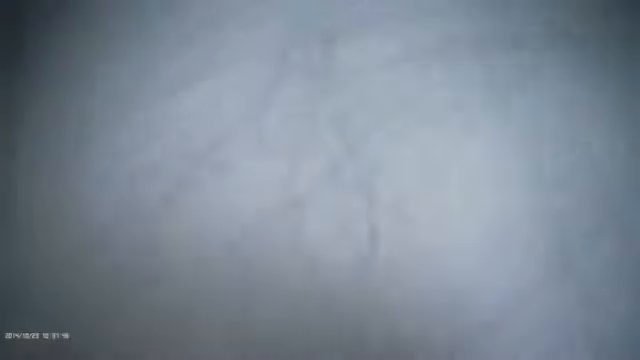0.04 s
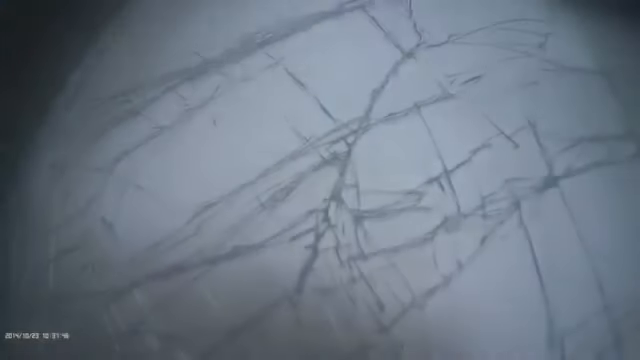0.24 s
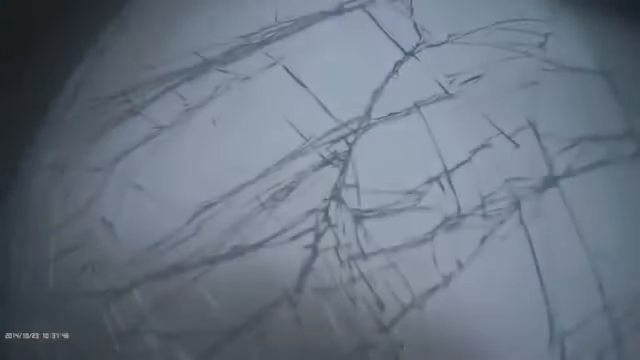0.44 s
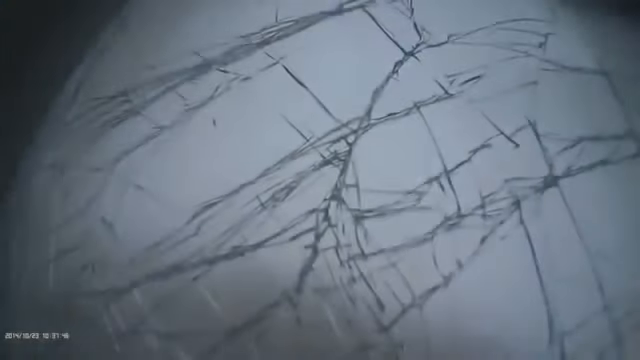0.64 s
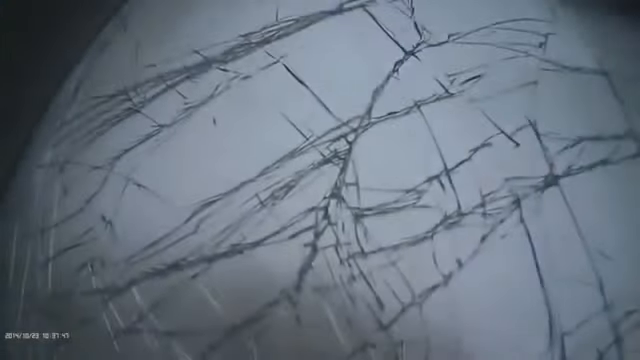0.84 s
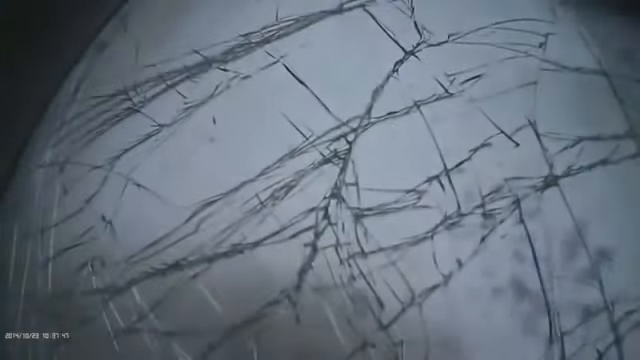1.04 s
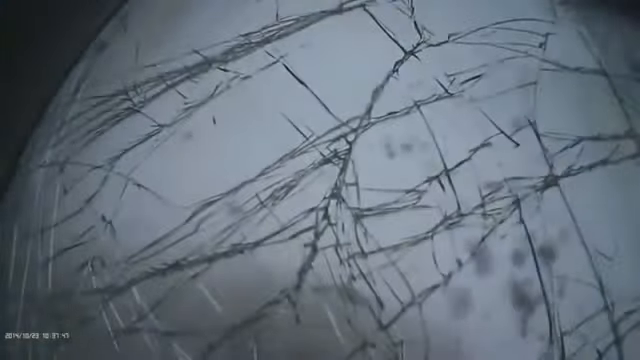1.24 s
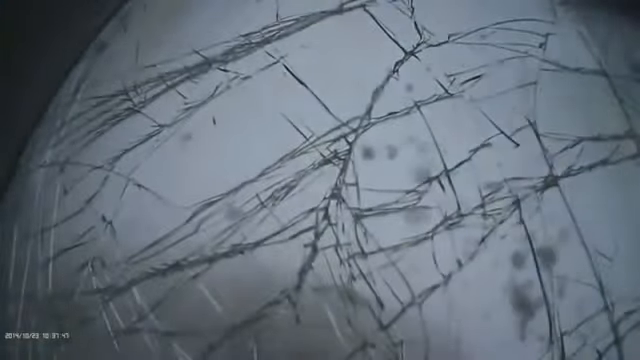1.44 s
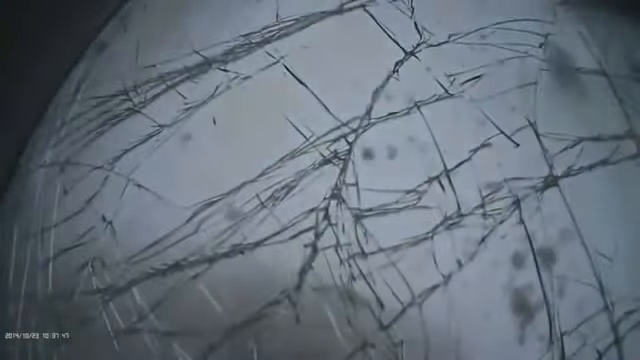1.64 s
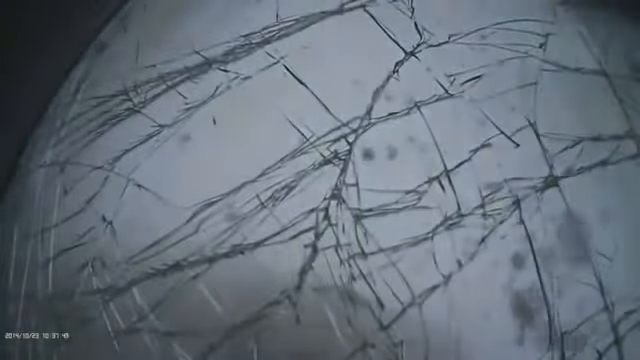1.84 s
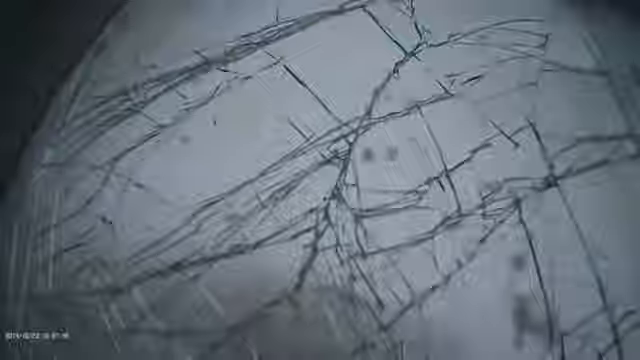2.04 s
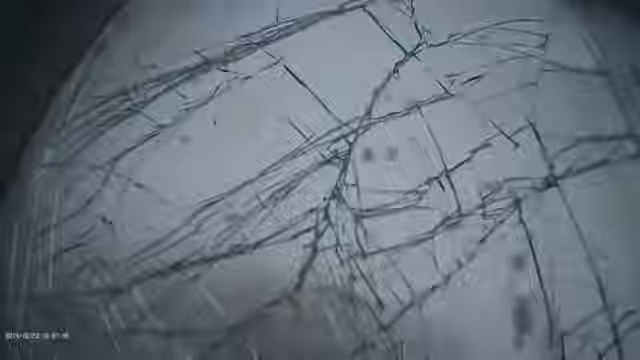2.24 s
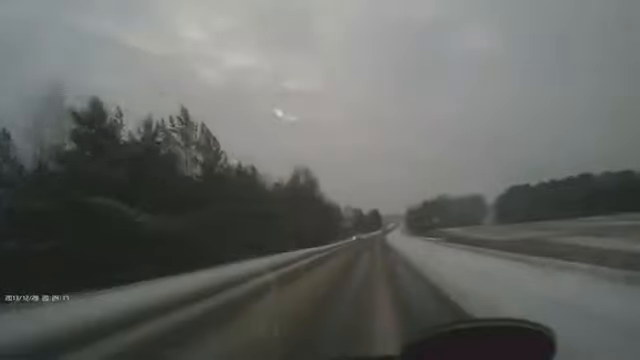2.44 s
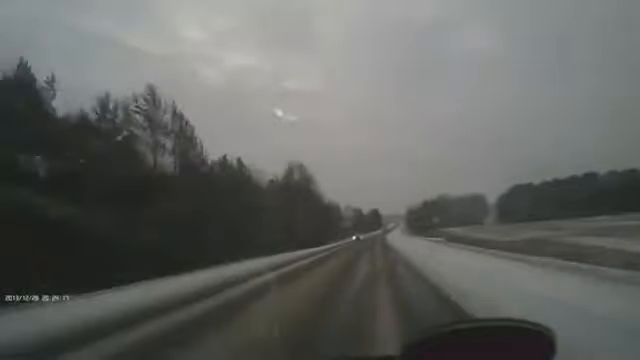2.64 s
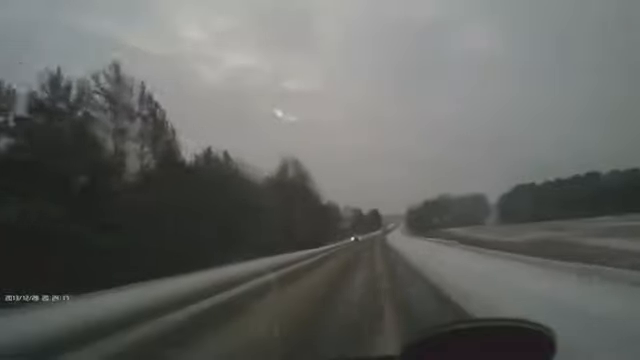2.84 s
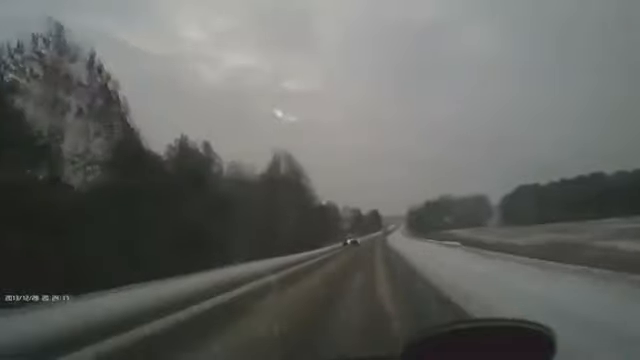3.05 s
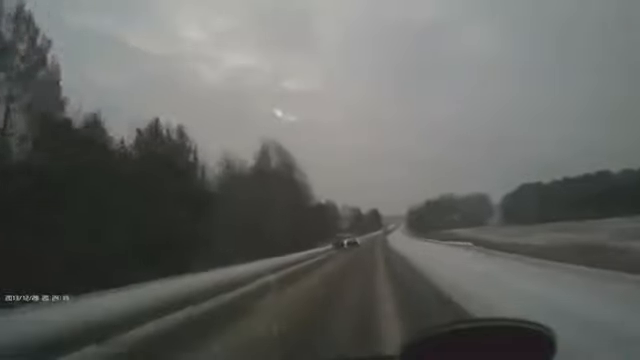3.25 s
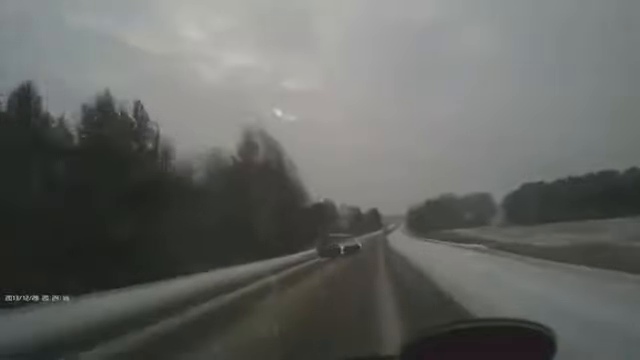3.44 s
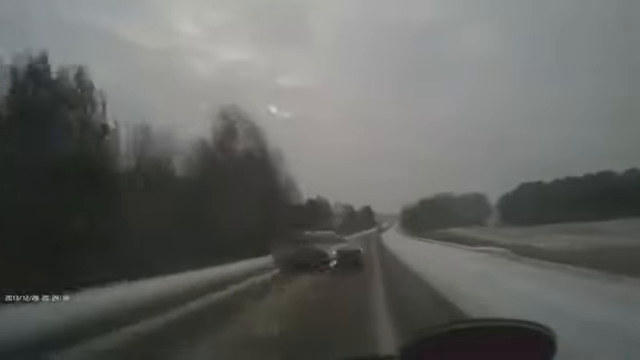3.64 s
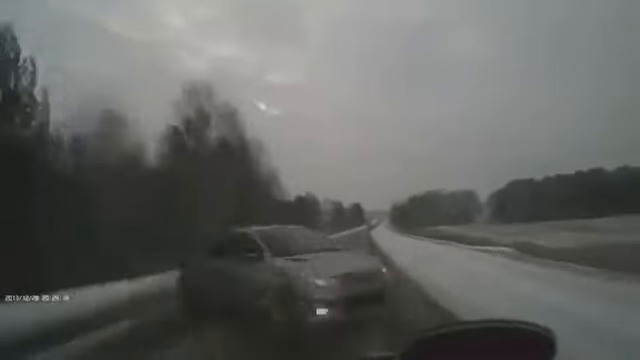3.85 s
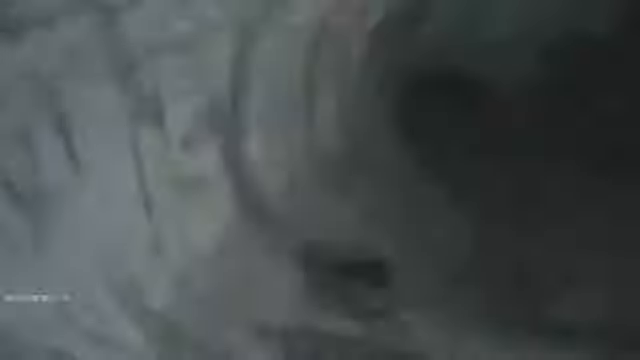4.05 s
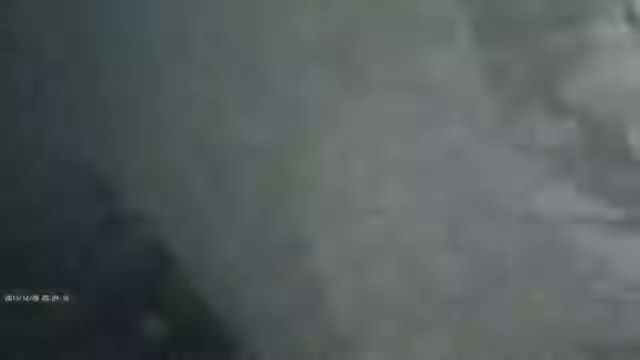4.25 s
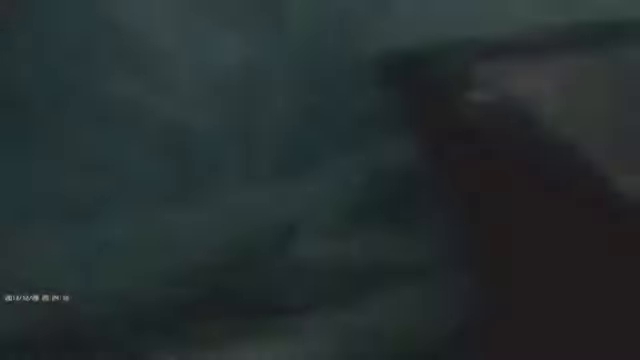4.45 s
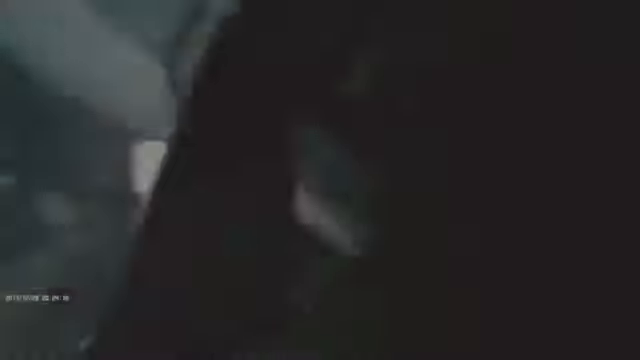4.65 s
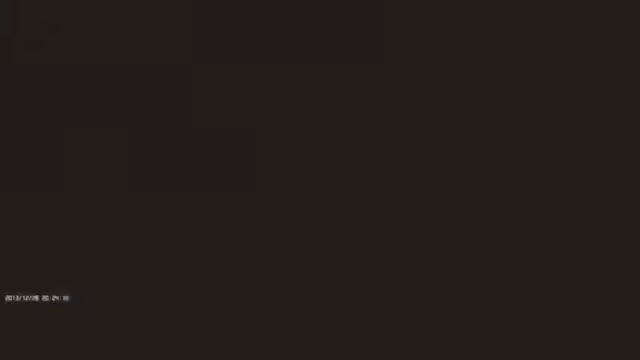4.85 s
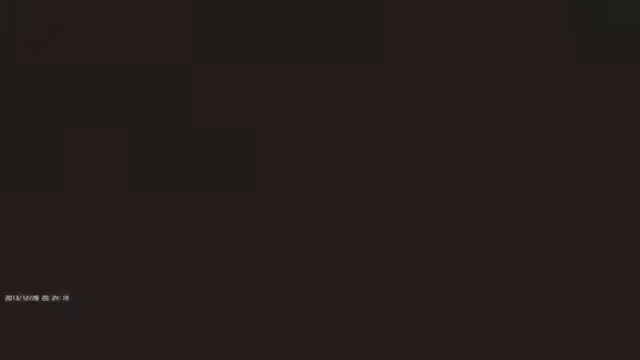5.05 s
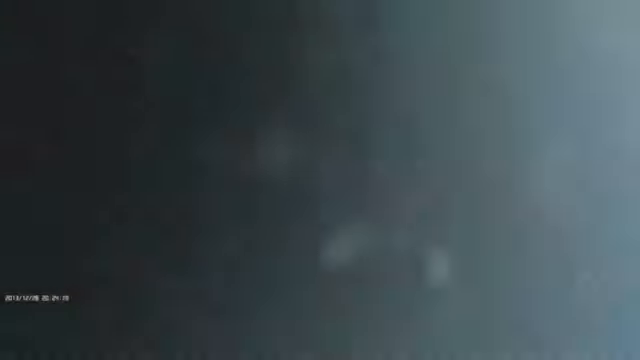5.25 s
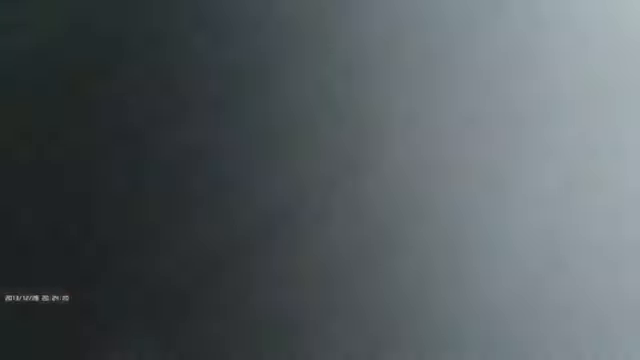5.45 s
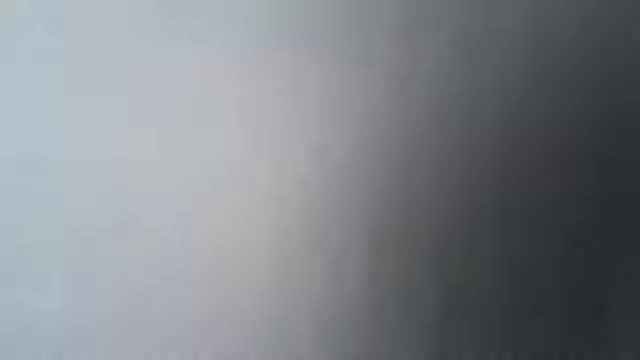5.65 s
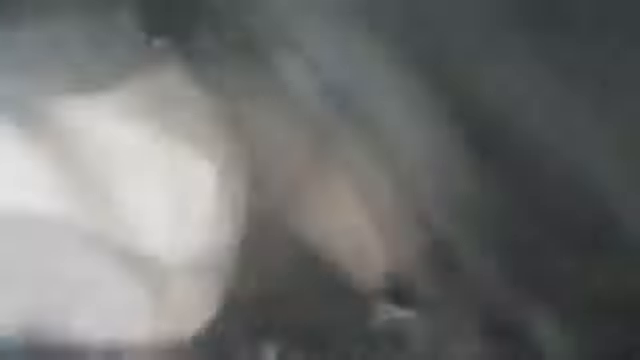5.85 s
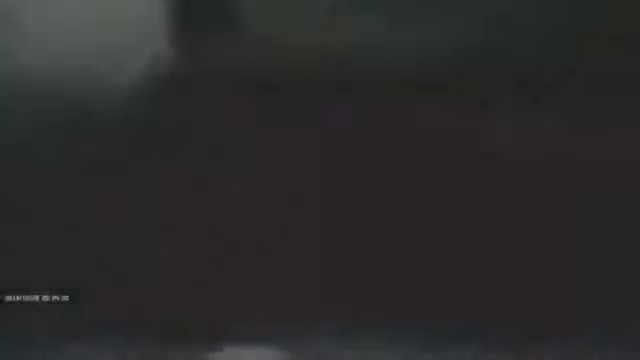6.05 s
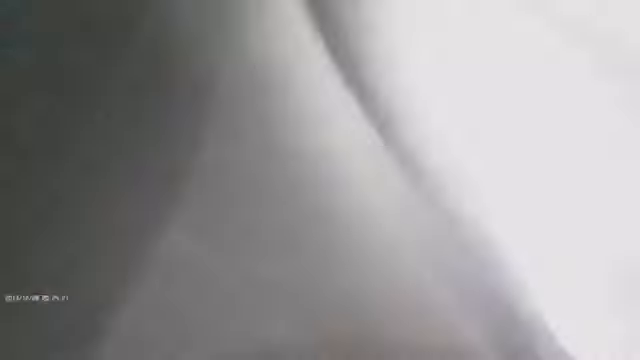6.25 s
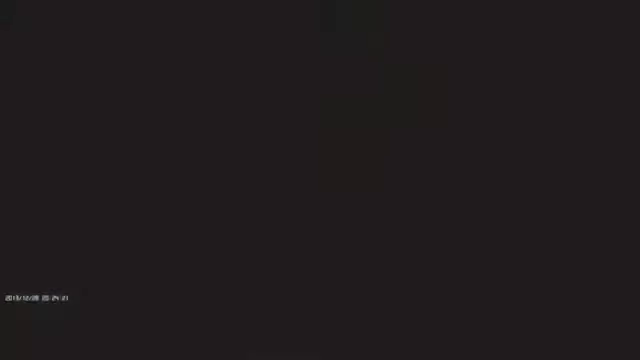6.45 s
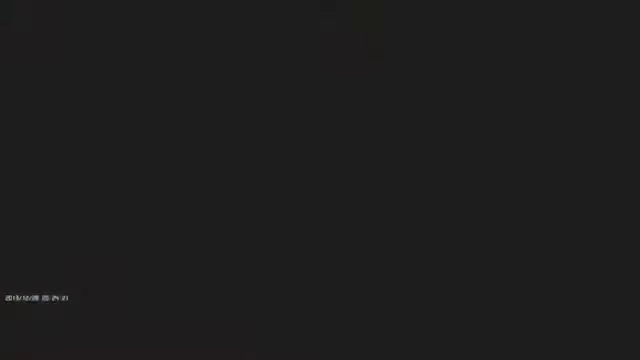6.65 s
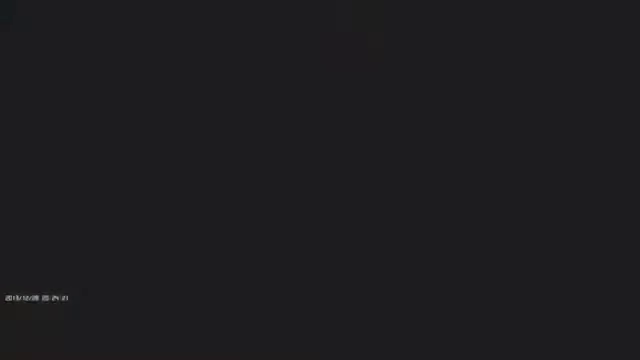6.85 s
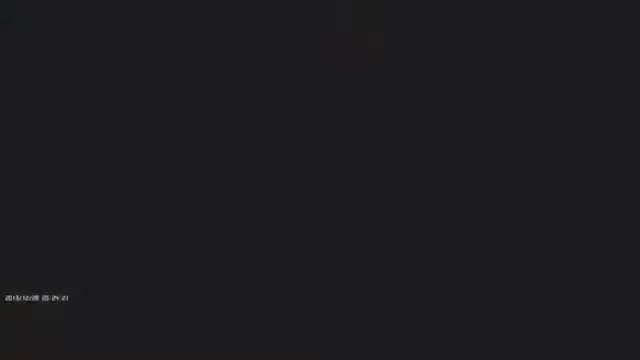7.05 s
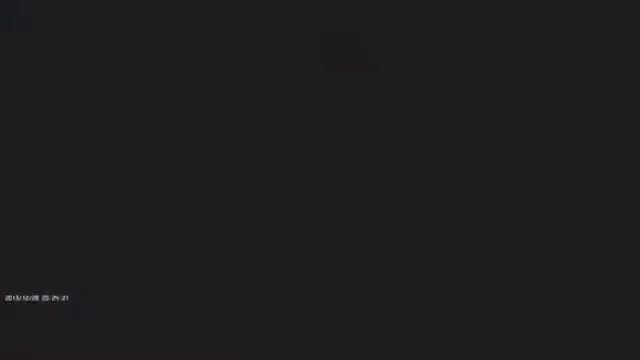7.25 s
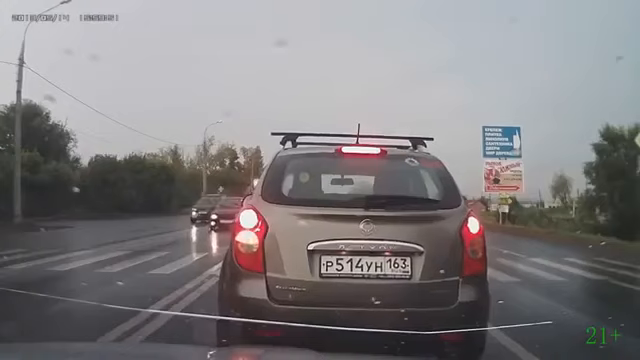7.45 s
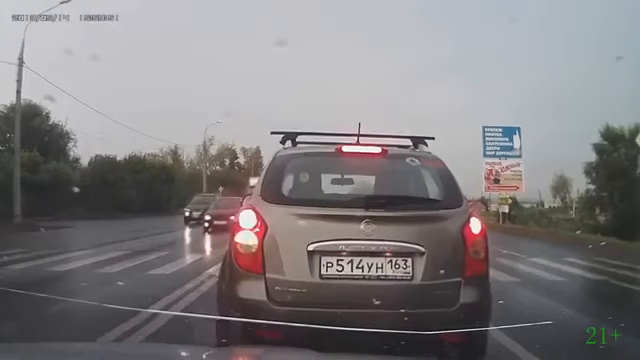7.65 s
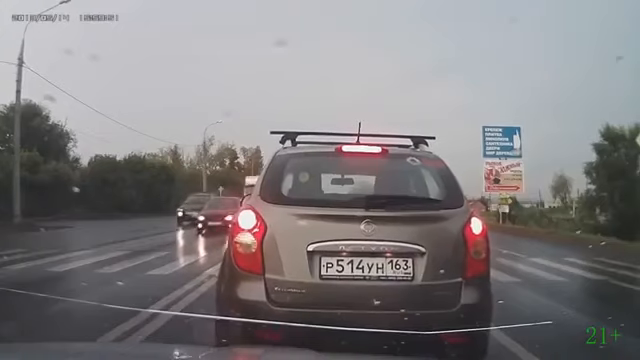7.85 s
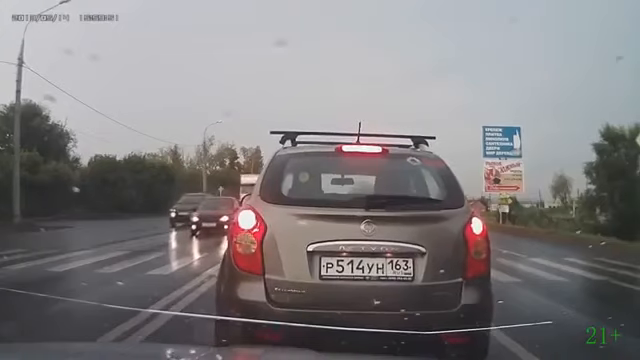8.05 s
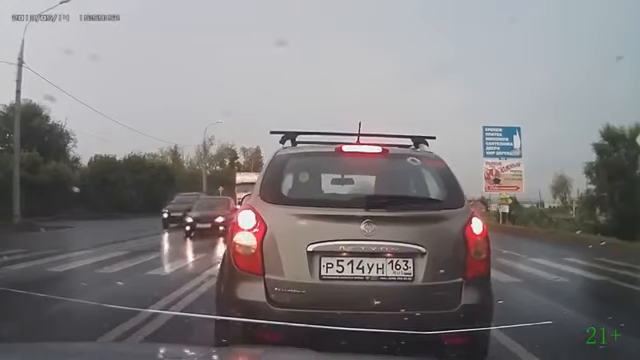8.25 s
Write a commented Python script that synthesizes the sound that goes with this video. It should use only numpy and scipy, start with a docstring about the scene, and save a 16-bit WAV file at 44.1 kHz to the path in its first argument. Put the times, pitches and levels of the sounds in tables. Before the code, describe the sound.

Three close in-cabin scenes with hard cuts. First, a car crunches twice and settles into low engine shudder, clatter and a thin mid-pitched whine. Next, subdued winter-road tyre noise, a very short raspy horn and a clipped, violent collision; the car tumbles through dense panel slams, booms, scrapes and flying shards. Last, a very quiet, low idling cabin.

```python
"""Two car crashes and an idle cabin

Three cars are heard from inside through overloaded mono microphones, joined by hard cuts. The first crunches
to rest: filtered noise and ringing grains, while its engine shudders on as wavering sines and a small motor whines.
The second runs on a winter road in tyre noise; a harmonic horn sounds, it is hit, and it tumbles in noise swells,
struck resonances and clicks of flying glass. The last is a quiet cabin at idle, in faint steady noise."""
import sys
import numpy as np
from scipy import signal
from scipy.fft import rfft, irfft
from scipy.io import wavfile
from scipy.ndimage import uniform_filter1d, map_coordinates

SR = 44100
rng = np.random.default_rng(int(sys.argv[2]) if len(sys.argv) > 2 else 0)


def store_pcm(level_fs):
    """Save levels as 16-bit WAV."""
    pcm = np.round(np.clip(level_fs, -1, 1) * 32767).astype(np.int16)
    wavfile.write(sys.argv[1], SR, np.atleast_2d(pcm).T)


N = 366471
TIME = np.arange(N) / SR  # s
FIRST_CUT_S, SECOND_CUT_S = 2.459, 7.513  # cuts between the three cars
CRASH_S = 4.102  # the second car is hit
TOP_HZ = 15200  # upper band limit


def amp(db):
    """Logarithmic level: decibels become linear gain."""
    return 10 ** (np.asarray(db) / 20)


def unit(x):
    """Energy normalisation: scale to rms 1."""
    return x / np.sqrt(np.mean(x ** 2) + 1e-20)


def curves(rows):
    """Linear interpolation: one value per sample for each column after the time."""
    s, *columns = np.transpose(rows)
    return [np.interp(TIME, s, column) for column in columns]


def between(start, end):
    """Gating: a window in time with 2 ms edges."""
    return np.clip(np.minimum(TIME - start, end - TIME) / .002, 0, 1)


def wobble(rate):
    """Random modulation: a smooth curve through random knots, rate per second."""
    knots = rng.standard_normal(int(N * rate / SR) + 4)
    return map_coordinates(knots, [TIME * rate])


def swell(start, rise, hold, t60):
    """Exponential decay: a gain that rises, holds and dies away by 60 dB in t60."""
    age = TIME - start
    attack = np.clip(age / max(rise, .001), 0, 1)
    return attack * amp(-60 * np.maximum(age - rise - hold, 0) / t60)


def colour(x, points, ripple_db=0):
    """Minimum-phase filtering: a causal spectral shape; ripple adds random resonances."""
    size = 8192
    log_hz = np.log(np.fft.rfftfreq(size, 1 / SR) + 1)
    hz, db = np.transpose(points)
    shape_db = np.interp(log_hz, np.log(hz), db)
    ripple = np.interp(log_hz, np.linspace(4, 10, 50), rng.standard_normal(50))
    cepstrum = irfft(np.log(amp(shape_db + ripple_db * ripple)))
    # folding the cepstrum onto positive time makes the response causal
    cepstrum[1:size // 2] *= 2
    cepstrum[size // 2 + 1:] = 0
    response = irfft(np.exp(rfft(cepstrum)))
    return signal.fftconvolve(x, response / np.linalg.norm(response))[:len(x)]


def noise(points):
    """Spectral shaping: coloured noise of rms 1."""
    return unit(colour(rng.standard_normal(N), points))


def grains(rate, centre_hz, cycles, scatter_db):
    """Granular fracture: many small cracks, each a damped ring of its own pitch and size."""
    count, t = int(rate * N / SR), np.arange(600) / SR
    start = rng.integers(0, N, (count, 1))
    size = np.minimum(rng.exponential(size=(count, 1)), 4)
    hz = np.minimum(centre_hz * np.exp(rng.standard_normal((count, 1)) * 0.61), TOP_HZ)
    damped = np.sin(2 * np.pi * hz * t) * np.exp(-hz * t / cycles)
    rings = amp(scatter_db * size) * np.sqrt(hz) * damped
    where = start + np.arange(len(t))
    return unit(np.bincount(where.ravel(), rings.ravel(), N)[:N])


def jolts(rate, decay, steady):
    """Stick and give: sudden random give-ways that die fast, over a steady share."""
    slips = (rng.random(N) < rate / SR) * rng.uniform(.4, 1, N)
    return unit(signal.lfilter([1], [1, -np.exp(-1 / (decay * SR))], slips) + steady)


# bending metal: new shapes per s, how far one dominates, depth of its resonances
BEND_RATE, BEND_DB, BEND_RIPPLE_DB = 14, 10, 4.5


def buckling(points):
    """Shifting modes: in bending sheet metal one set of resonances gives way to the next."""
    mix = np.zeros(N)
    for _ in range(6):
        prominence = amp(BEND_DB * wobble(BEND_RATE))
        mix += prominence * colour(rng.standard_normal(N), points, BEND_RIPPLE_DB)
    power = np.abs(uniform_filter1d(mix ** 2, size=1024))
    return mix / np.sqrt(power + 1e-12)  # hold the loudness even


def add(track, s, sound):
    """Superposition: mix a sound in at time s."""
    part = track[max(round(s * SR), 0):][:len(sound)]
    part += sound[:len(part)]


def strikes(rows, spectrum, ripple_db, tail_db=-40, tail_t60=0.24):
    """Impact excitation: each blow bursts through its own resonances, then leaves a short rattle."""
    out, t = np.zeros(N), np.arange(SR // 3) / SR
    onset = 1 - np.exp(-t / 0.00039)
    for s, db, t60 in rows:
        decay = amp(-60 * t / max(t60, .005))
        tail = amp(tail_db - 60 * t / tail_t60)
        force = (decay + tail) * onset * rng.standard_normal(len(t))
        add(out, s, amp(db) * colour(force, spectrum, ripple_db))
    return out


# the second car's shell hits the other car, then the ground as it rolls:
# start_s, hold_s, boom level_db, crumpling metal level_db
LANDINGS = [(4.1, 0.14, -12, -6.5), (4.737, 0.037, -16, -19), (5.047, 0.091, -14, -25),
            (5.214, 0.16, -10, -9.5), (5.907, 0.12, -20.5, -14), (6.94, 0.16, -21, -35),
            (7.315, 0.13, -15, -25)]
# sliding between landings: time_s, scraping metal level_db, loose glass level_db
SLIDE = [(4.35, -11.5, -35), (4.6, -19.5, -27.5), (5.55, -19, -37), (5.9, -18, -29), (6.5, -29.5, -36.5),
         (6.85, -27, -28), (7.2, -32.5, -45), (7.5, -38, -45.5)]
# relative spectra of the booming shell, sheet metal and splintering glass: frequency_hz, level_db (per Hz)
RUMBLE_SPECTRUM = [(15, -23), (35, 5.5), (90, -2.5), (220, 2.5), (550, -4.5), (1300, -19), (2600, -56.5)]
METAL_SPECTRUM = [(100, -32.5), (350, -1.5), (800, 1), (1500, 2.5), (2300, -3.5), (3200, -17.5),
                  (15000, -77)]
SPLINTER_SPECTRUM = [(500, -25.5), (1600, -1.5), (3800, 5), (5800, -3), (7300, 3.5), (8600, -4.5),
                     (15000, -13.5)]
LANDING_RISE_S, BOOM_T60_S, CRUMPLE_T60_S = 0.0066, .4, 0.32
SPLINTER_DB, SPLINTER_GROWTH = -7, 1.55  # level at unit crush; exponent of its growth with crush
DENSE_DB = -5.5  # above this crush the separate fits merge into one roar
SLIDE_RUMBLE_DB = -28


def tumble():
    """Forced vibration: landings boom, crumple metal in fits and splinter glass; in between the car slides."""
    boom, crush = np.zeros(N), np.zeros(N)
    for s, hold, boom_db, crumple_db in LANDINGS:
        boom += amp(boom_db) * swell(s, LANDING_RISE_S, hold, BOOM_T60_S)
        crush += amp(crumple_db) * swell(s, LANDING_RISE_S, hold, CRUMPLE_T60_S)
    scraping, loose_glass = amp(curves(SLIDE))
    windscreen = amp(-6.5) * swell(CRASH_S, rise=0.044, hold=0.027, t60=0.42)  # bursts in the collision
    crumpling = np.hypot(crush, scraping)
    splintering = np.hypot(amp(SPLINTER_DB) * crush ** SPLINTER_GROWTH + windscreen, loose_glass)

    separateness = 1 / (1 + (crumpling / amp(DENSE_DB)) ** 2)
    fits = 1 + (jolts(rate=150, decay=0.0035, steady=0.38) - 1) * separateness
    folds = unit(colour(grains(rate=700, centre_hz=1187, cycles=3.5, scatter_db=5.5), METAL_SPECTRUM))
    chips = unit(colour(grains(rate=500, centre_hz=5600, cycles=0.6, scatter_db=6.5), SPLINTER_SPECTRUM))
    metal = crumpling * unit(folds + buckling(METAL_SPECTRUM))
    glass = splintering * unit(chips + 0.55 * noise(SPLINTER_SPECTRUM))
    rumble = np.hypot(boom, amp(SLIDE_RUMBLE_DB)) * noise(RUMBLE_SPECTRUM)
    return rumble + fits * metal + np.sqrt(np.abs(fits)) * glass


# blows on the rolling body: start_s, level_db
BLOWS = [(4.339, -6), (4.549, -10.5), (4.561, -8), (4.592, -5), (4.623, -0.5), (4.672, -5), (4.728, 1),
         (4.763, 4.5), (4.814, -4), (4.863, -4), (4.898, -6), (4.92, -1.5), (5.005, 2.5), (5.053, -4.5),
         (5.065, -2.5), (5.134, -4.5), (5.234, -0.5), (5.283, 2), (5.37, 6), (5.49, -3.5), (5.722, -9),
         (5.78, 5), (5.831, -10), (5.949, 4), (5.989, -1.5), (6.01, -3), (6.026, 8.5), (6.057, 1.5),
         (6.122, -2), (6.174, -2.5), (6.19, 9), (6.204, 5.5), (6.233, 5), (6.274, 2.5), (6.324, 7.5),
         (6.398, 1.5), (6.438, 3.5), (6.464, 3.5), (6.591, 4), (6.697, 3), (6.791, -1.5), (6.812, -4),
         (6.846, -1), (6.856, -1.5), (6.959, -7), (6.985, -8), (7.02, -10.5), (7.039, 3.5), (7.063, 0.5)]
# relative spectra of the slammed panels and the shaken body: frequency_hz, level_db (per Hz)
PANEL_SPECTRUM = [(25, -0.5), (150, -3), (450, 2.5), (950, 4), (1600, -2), (3000, -11.5), (5800, -18.5),
                  (7300, -19.5), (9000, -27), (15000, -35.5)]
SHAKE_SPECTRUM = [(10, -7), (22, 5), (40, -2.5), (80, -5.5), (150, -11.5), (500, -66.5)]
FIRST_BLOW_T60_S, LAST_BLOW_T60_S = 0.068, .032  # blows get shorter as the car loses speed
SNAP_DB, SNAP_T60_S = -8.5, 0.016  # level relative to the blow
THUMP_DB, THUMP_T60_S = -20, 0.11  # level relative to the blow


def body_blows():
    """Modal impact: panels slam on the ground, brittle trim snaps with them and the whole shell thumps."""
    t60s = np.linspace(FIRST_BLOW_T60_S, LAST_BLOW_T60_S, len(BLOWS))
    slams = [(s, db, t60) for (s, db), t60 in zip(BLOWS, t60s)]
    snaps = [(s, db + SNAP_DB, SNAP_T60_S) for s, db in BLOWS]
    thumps = [(s, db + THUMP_DB, THUMP_T60_S) for s, db in BLOWS]
    out = strikes(slams, PANEL_SPECTRUM, ripple_db=5.0)
    out += strikes(snaps, SPLINTER_SPECTRUM, ripple_db=5.5)
    return out + strikes(thumps, SHAKE_SPECTRUM, ripple_db=2.5)


# the loudest glass and plastic bits striking near the microphone: start_s, level_db (relative)
SHARDS = [(4.489, -2.5), (4.4956, -1), (4.5495, 2), (4.654, 1), (4.665, -4), (4.8408, -4.5), (4.88, -10.5),
          (5.088, -1.5), (5.197, -4), (5.375, 2), (5.5778, -4.5), (5.808, -3.5), (6.571, -11.5),
          (6.6142, -1), (6.691, -3.5), (7.1733, -10), (7.1974, -9.5), (7.233, -13), (7.255, -11),
          (7.305, -15.5)]


def shards():
    """Short impacts: hard little bits click, each with its own ring, and tap the panel they land on."""
    out, t = np.zeros(N), np.arange(SR // 20) / SR
    for s, db in SHARDS:
        burst = amp(db - 3.5) * rng.standard_normal(len(t)) * amp(-60 * t / 0.0076)
        click = colour(burst, SPLINTER_SPECTRUM, ripple_db=3.5)
        tap = 0.89 * colour(burst, METAL_SPECTRUM)
        add(out, s, click + tap)
    return out


# relative spectrum of the grating panel edge: frequency_hz, level_db (per Hz)
GRATE_SPECTRUM = [(700, -14.5), (1450, 1), (1900, -6.5), (2430, 4), (3000, -13), (5000, -14), (15000, -58)]
GRATE_S, GRATE_RATE, GRATE_DB = 5.64, 68, -13  # start, mean slips per s, level


def grating():
    """Stick-slip friction: a panel edge judders along the ground in quick, uneven slips."""
    turns = np.cumsum(GRATE_RATE * (1 + 0.046 * wobble(40))) / SR
    slips = unit(np.exp(-1.8 * (turns % 1)))
    envelope = swell(GRATE_S, rise=0.042, hold=0.047, t60=0.04)
    return amp(GRATE_DB) * envelope * slips * noise(GRATE_SPECTRUM)


# the first car is crushed, comes down again and settles:
# start_s, rise_s, hold_s, body shake level_db, crunch level_db, crunch t60_s
CRUSHES = [(0.125, 0.0026, 0.16, -6, -5.5, 0.44), (0.831, 0.003, 0.043, -9.5, -7, 0.16),
           (0.892, 0.02, 0.13, -9.5, -15, 0.071)]
# relative spectrum of the crunching front end: frequency_hz, level_db (per Hz)
CRUNCH_SPECTRUM = [(60, -13), (200, 7.5), (900, -6), (1600, 0.5), (2300, -11), (2900, -12.5), (3700, -25),
                   (5900, -27.5), (6700, -33), (7900, -27.5), (9000, -44), (15000, -52.5)]
CLATTER_DB, SHUDDER_DB = -26.5, -24.5  # the damaged engine clatters and shakes the body
SHAKE_T60_S = 1.93  # the body goes on rocking
WRECK_BOOM_DB = -3  # shell boom relative to the crunch


def first_wreck():
    """Plastic collapse: each crush crunches the front end and leaves the body rocking, grainier when harder."""
    crush, rocking = np.zeros(N), np.zeros(N)
    for s, rise, hold, shake_db, crunch_db, t60 in CRUSHES:
        crush += amp(crunch_db) * swell(s, rise, hold, t60)
        rocking = np.maximum(rocking, amp(shake_db) * swell(s, rise + hold, 0, SHAKE_T60_S))
    level = np.hypot(crush, amp(CLATTER_DB))
    violence = np.clip(rocking / amp(-23.0), .2, 1)

    cracks = unit(colour(grains(rate=700, centre_hz=1426, cycles=1.1, scatter_db=3.5), CRUNCH_SPECTRUM))
    fits = 1 + violence * (jolts(rate=83, decay=0.0032, steady=0.69) - 1)
    bending = np.sqrt(violence) * buckling(CRUNCH_SPECTRUM)
    sheet = bending + np.sqrt(np.abs(1 - violence)) * noise(CRUNCH_SPECTRUM)
    crunch = fits * (sheet + violence * cracks) / np.sqrt(1 + violence)
    boom = amp(WRECK_BOOM_DB) * crush * noise(RUMBLE_SPECTRUM)
    shake = np.hypot(rocking, amp(SHUDDER_DB)) * noise(SHAKE_SPECTRUM)
    return shake + level * crunch + boom


# the first car's body heaves and squeezes the cabin air: start_s, length_s, level_db (before damping)
HEAVES = [(0.016, .034, 2), (.059, .068, 6), (1.041, 0.0277, 5)]


def heaves():
    """Cabin compression: a slow pressure push and its weaker rebound, strong enough to choke the microphone."""
    out = np.zeros(N)
    for s, length, db in HEAVES:
        progress = np.clip((TIME - s) / length, 0, 1)
        out -= amp(db) * np.sin(2 * np.pi * progress) * np.exp(-2 * progress)
    return out


# knocks in the cabin and dull bumps of the bodywork: start_s, level_db, t60_s
KNOCKS = [(0.0, 1.5, 0.078), (.03, 4, 0.03), (.056, 0, .014), (.1, -5, 0.03), (.288, 2.5, 0.071),
          (.364, -2, 0.035), (.433, -1.5, 0.043), (.453, -0.5, 0.0069), (.57, -10, 0.12), (.662, -16, 0.35),
          (.76, -6.5, 0.12), (.806, 0, 0.035), (.93, -2.5, 0.063), (1.026, -5, 0.063), (1.355, -14.5, 0.05),
          (2.097, -6, 0.042), (3.803, -23.5, 0.12), (4.0102, -9, 0.008)]
THUDS = [(1.438, -13, 0.17), (4.103, 3, 0.048)]
# relative spectrum of the knocked trim: frequency_hz, level_db (per Hz)
TRIM_SPECTRUM = [(100, 0.5), (700, 5.5), (1500, 5), (2300, -5.5), (4000, -22.5), (7500, -26),
                 (15000, -49.5)]


def bumps():
    """Struck resonators: knocks ring the trim and thuds the bodywork."""
    knocks = strikes(KNOCKS, TRIM_SPECTRUM, ripple_db=3.5)
    return knocks + strikes(THUDS, RUMBLE_SPECTRUM, ripple_db=3.5)


def engine():
    """Periodic rotation: two shuddering engine harmonics, a small motor's whine and a thin wavering whistle."""
    turn = 2 * np.pi * np.cumsum(36.2 + .5 * wobble(6.9)) / SR
    firing = amp(-20.0) * np.sin(turn) + amp(-23 + 1.8 * wobble(22)) * np.sin(2 * turn)
    # whine: time_s, pitch_hz, level_db
    whine_hz, whine_db = curves([(.5, 695.4, -28.5), (.85, 683, -21), (1.15, 700, -25), (2.3, 700, -23)])
    whine_phase = 2 * np.pi * np.cumsum(whine_hz + wobble(7.5)) / SR
    whine = amp(whine_db + 1.2 * wobble(5.7)) * np.sin(whine_phase)
    whistle = amp(-45) * np.sin(2 * np.pi * np.cumsum(2658 + 45 * wobble(300)) / SR)
    fade_in = np.clip((TIME - .35) / 0.13, 0, 1)
    return (firing + whine + whistle) * fade_in


# horn partials: harmonic_number, level_db (rms)
HORN = [(1, -49.5), (2, -47.5), (7, -55), (8, -55), (9, -60), (10, -49.5), (11, -65)]


def horn():
    """Harmonic series: a rasping horn of slightly unsteady pitch begins just before the collision."""
    phase = 2 * np.pi * np.cumsum(369.3 + 3 * wobble(200)) / SR
    tone = sum(amp(db) * np.sin(k * phase) for k, db in HORN)
    return np.sqrt(2) * tone * (TIME > 3.985)


# tyre roar: time_s, level_db
ROAD = [(2.46, -39.5), (3.78, -41), (3.88, -34.5), (4.1, -33.5)]
# spells of buzzing trim: start_s, length_s
RATTLES = [(2.497, 0.088), (2.82, .15), (3.205, .125), (3.635, 0.11)]
# relative spectra of the tyres and the buzzing trim: frequency_hz, level_db (per Hz)
TYRE_SPECTRUM = [(56, -0.5), (85, -11), (500, -14.5), (1300, -21.5), (3400, -44), (12000, -59)]
RATTLE_SPECTRUM = [(2500, -10.5), (5600, 1), (8200, -9.5), (10000, -23)]
RATTLE_RATE, RATTLE_DB = 70, -61  # mean taps per s, level before the spells


def road():
    """Surface excitation: tyres roar, and loose trim taps faintly throughout and buzzes in short spells."""
    tyres = amp(curves(ROAD)[0] + wobble(7.2)) * noise(TYRE_SPECTRUM)
    turns = np.cumsum(RATTLE_RATE * (1 + .3 * wobble(RATTLE_RATE))) / SR
    taps = unit(np.exp(-7 * (turns % 1)) * amp(5 * wobble(RATTLE_RATE)))
    spells = sum(between(s, s + length) for s, length in RATTLES) + 0.32
    return tyres + amp(RATTLE_DB) * spells * taps * noise(RATTLE_SPECTRUM)


# relative spectrum of the idling cabin: frequency_hz, level_db (per Hz)
IDLE_SPECTRUM = [(20, -2), (110, -24), (250, -45), (5000, -27.5), (15000, -34)]


def idle_cabin():
    """Stationary noise: the last car's quiet cabin at idle."""
    return amp(-59.0) * noise(IDLE_SPECTRUM) * (TIME > SECOND_CUT_S)


def scene():
    """Superposition: three cars one after another, the same in both channels."""
    first = (first_wreck() + heaves() + engine()) * between(0, FIRST_CUT_S)
    drive = (road() + horn()) * between(FIRST_CUT_S, CRASH_S)
    rolling = (tumble() + grating() + body_blows() + shards()) * between(CRASH_S, SECOND_CUT_S)
    mono = first + drive + rolling + bumps() + idle_cabin()
    return np.array([mono] * 2)


def record(dry):
    """Asymmetric clipping: microphones overload lopsidedly, a little still gets through, DC and top are cut."""
    bias = np.where(TIME < FIRST_CUT_S, .13, -.09)
    limit = 0.56 + bias * np.sign(dry)
    flat_topped = dry / (1 + np.abs(dry / limit) ** 10) ** (1 / 10)
    clipped = .96 * flat_topped + .08 * np.tanh(dry / 2)
    blocked = signal.sosfilt(signal.butter(1, 6, "high", fs=SR, output="sos"), clipped)
    return signal.sosfilt(signal.ellip(10, .1, 80, TOP_HZ, fs=SR, output="sos"), blocked)


dry = scene()
out = record(dry)
store_pcm(out)
```